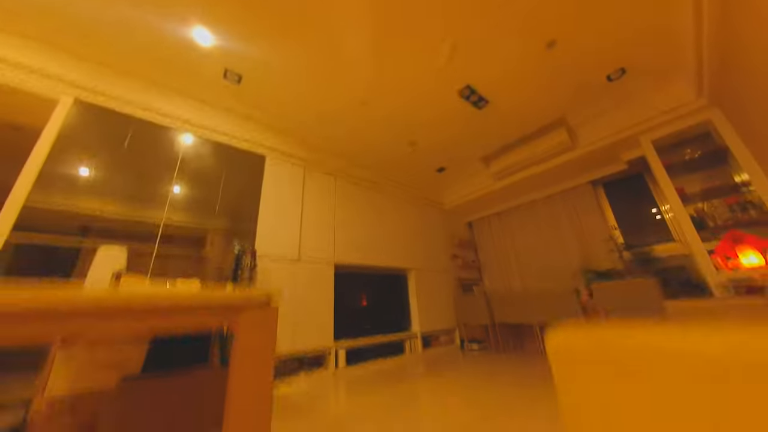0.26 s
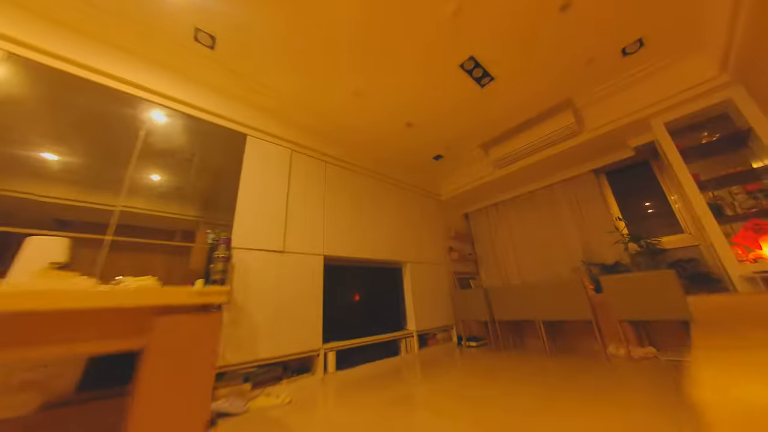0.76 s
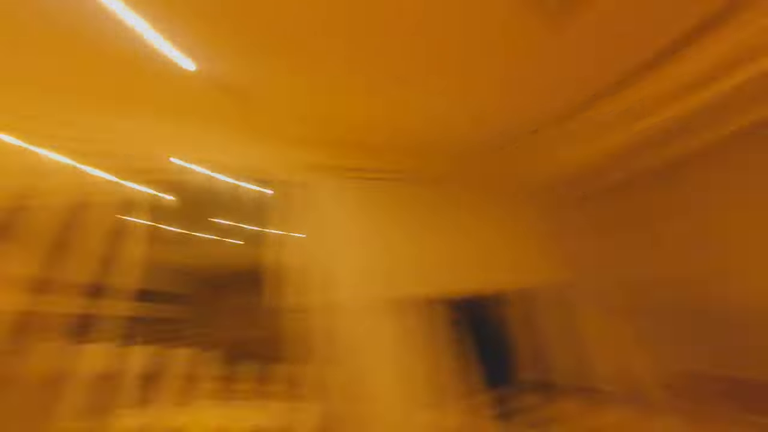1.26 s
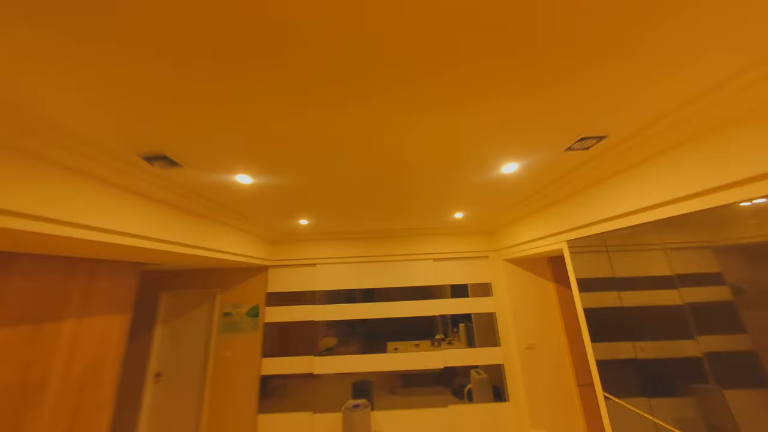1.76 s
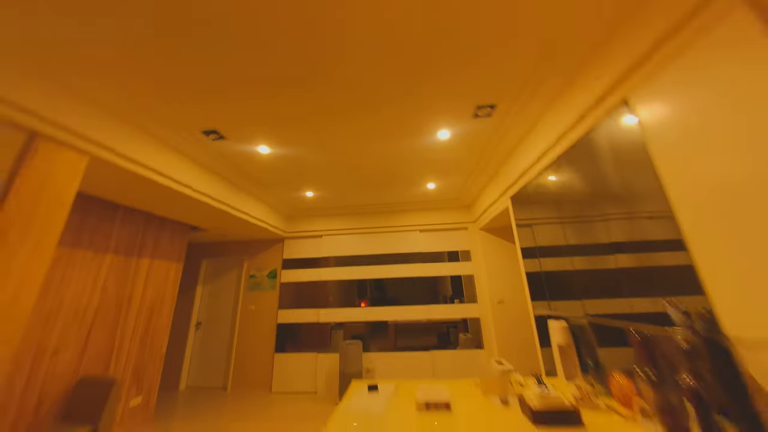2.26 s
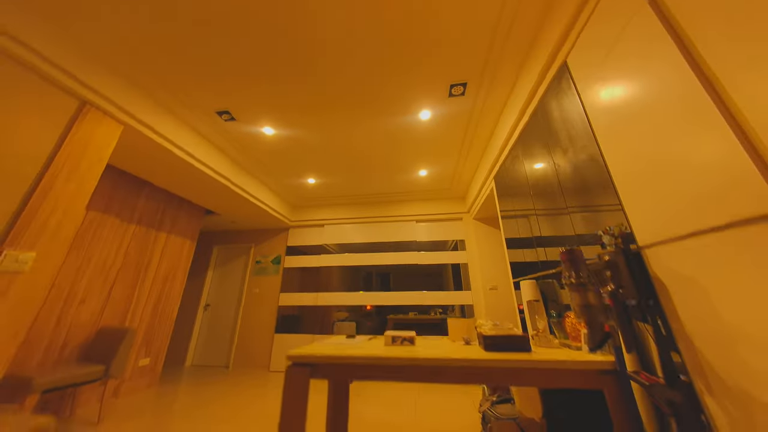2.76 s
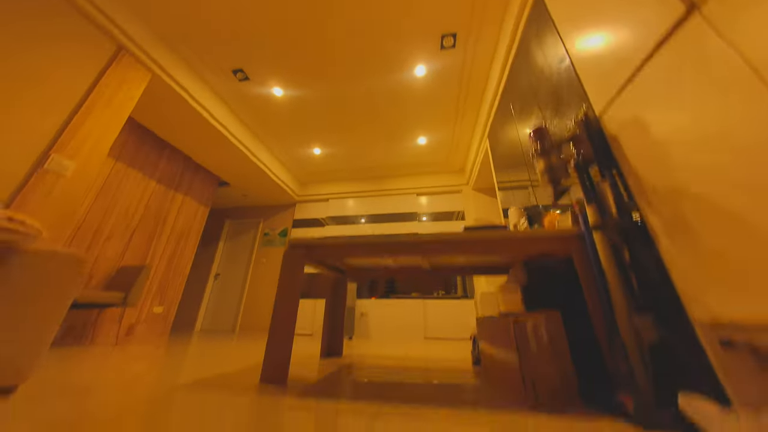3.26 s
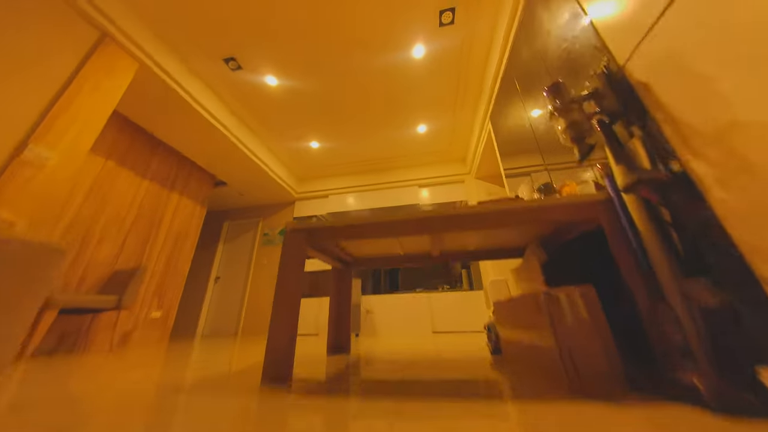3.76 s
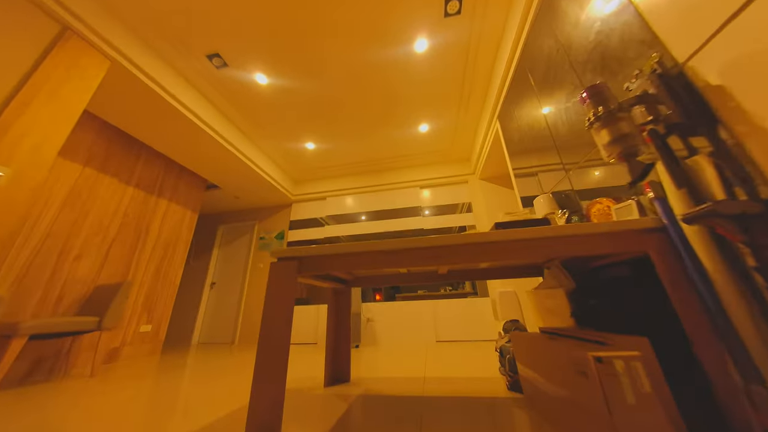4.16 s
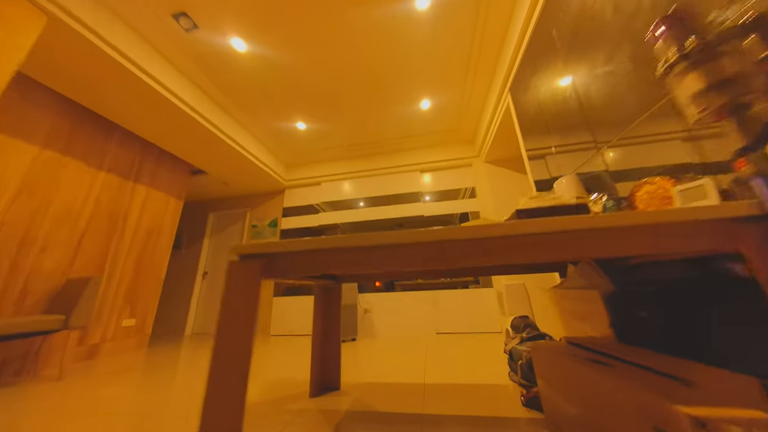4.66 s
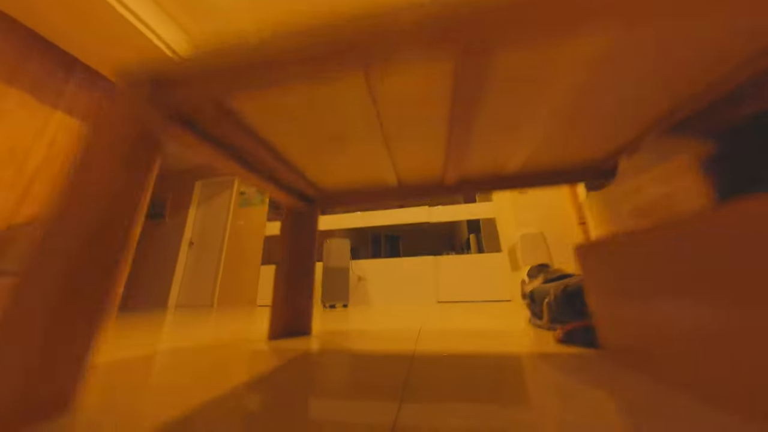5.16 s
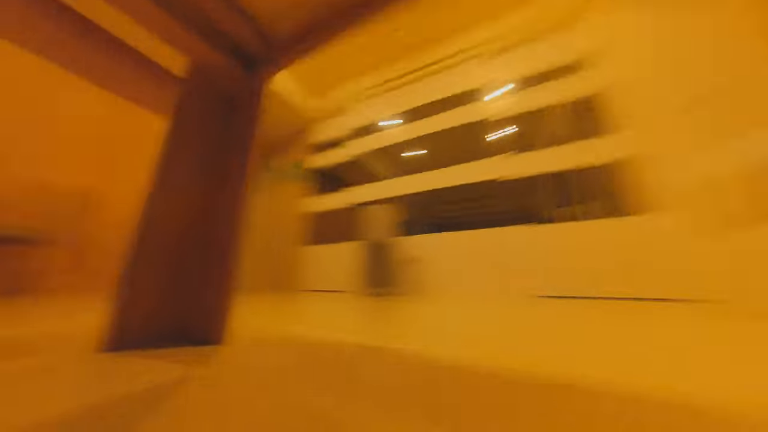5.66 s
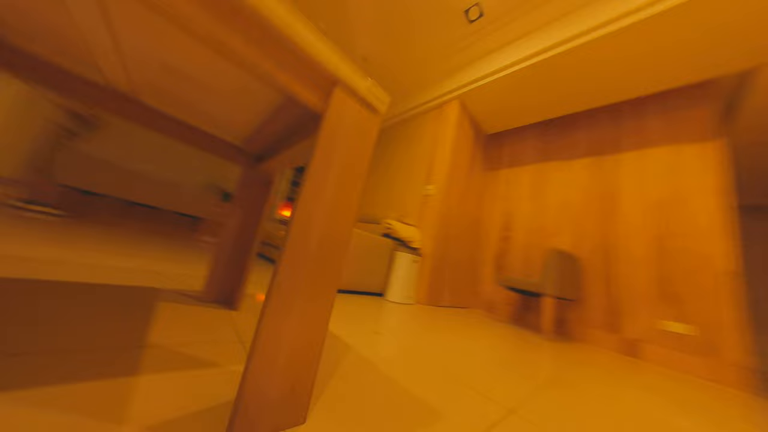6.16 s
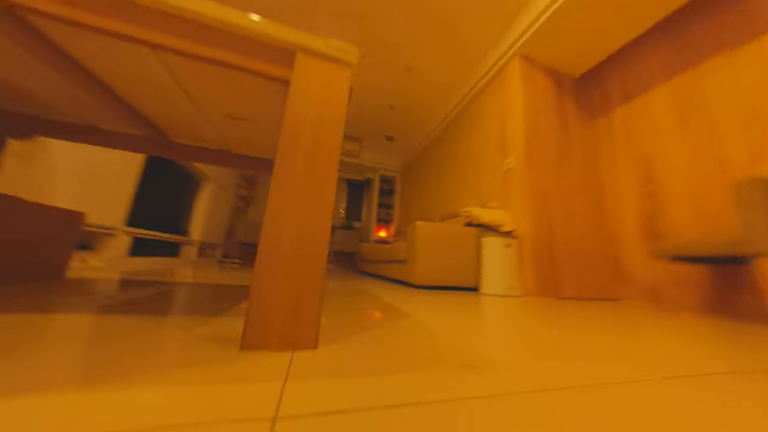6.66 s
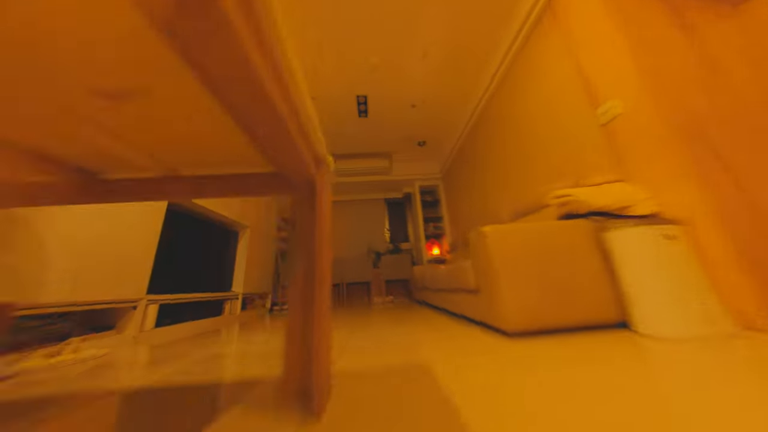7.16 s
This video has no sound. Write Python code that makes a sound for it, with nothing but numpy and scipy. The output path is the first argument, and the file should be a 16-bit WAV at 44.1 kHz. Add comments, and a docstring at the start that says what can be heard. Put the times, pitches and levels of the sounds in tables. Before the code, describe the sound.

A close microphone on a little indoor drone catches buzzing blades, thin motor whistle and rushing air. Quick throttle bursts swoop up to overloaded screams, then the rotors coast down and nearly fade. After that the whine rises and dips in smoother waves, jolted once midway by a rough flutter and a wind thump, and ends in a steady wavering buzz. The room adds only a short, tight reflection.

```python
"""Quadcopter in a living room

A small quadcopter flies low, heard from the camera it carries, as the throttle rises and is cut.
Four three-blade rotors, summed from harmonics of their shaft rates, whine and beat; motors whistle thinly.
Filtered noise gives the blade hiss, pulsing at the blade rate, and the prop wash on the microphone.
Levels grow with rotor speed, until gain control holds them and the input overloads softly."""
import sys
import numpy as np
from scipy import signal
from scipy.fft import rfft, irfft, next_fast_len
from scipy.io import wavfile
from scipy.ndimage import uniform_filter1d

SR = 44100
rng = np.random.default_rng(int(sys.argv[2]) if len(sys.argv) > 2 else 0)


def waveform_to_disk(signal):
    """Save audio, clipped to [-1, 1], as 16-bit WAV at the path in sys.argv[1]."""
    frames = np.transpose(np.atleast_2d(signal))
    scaled = np.clip(frames, -1, 1) * 32767
    samples = np.round(scaled).astype(np.int16)
    wavfile.write(sys.argv[1], SR, samples)


N = 326340
TIME = np.arange(N) / SR   # s
BLADES = 3   # per rotor
HOVER_HZ = 800   # blade-pass rate at hover

# levels at hover ahead of the gain control [dB], and their growth with speed [dB per octave]
WHINE_DB, WHINE_DB_PER_OCTAVE = -7, 14.0
HISS_DB, HISS_DB_PER_OCTAVE = -9.5, 13.5
WASH_DB, WASH_DB_PER_OCTAVE = -29.5, 14
STALL_OCTAVES = 0.58   # above hover by this much, more speed adds nothing to this growth
# louder while spinning up, softer while coasting [dB per octave/s]
WHINE_DB_PER_OCTAVE_S, HISS_DB_PER_OCTAVE_S = 0.26, 0.12
MOTOR_DB = -9   # motor whistle relative to the hiss level
# rotors this close in speed sing together: louder, with a stronger third blade harmonic
UNISON_OCTAVES, UNISON_DB, UNISON_THIRD_DB = 0.041, 8, 10
SCREAM_HOLD_S = .045   # the sharp blade stroke lingers while the rotor winds down
JOLT_S, JOLT_OCTAVES, JOLT_DECAY_S = 3.635, .28, .05   # sudden correction just above the floor
CUTOFF_HZ = 15750


def rotor_rates():
    """Blade-pass rates: thrust control moves all four rotors, steering sets their speeds apart."""
    # throttle, as the fastest rotor's turning points: (time [s], blade-pass rate [Hz])
    throttle = [(0.0, 1087), (0.09, 573.5), (0.17, 426.7), (0.28, 660), (0.44, 1023), (0.551, 1354),
                (0.65, 844.5), (0.719, 636.6), (0.785, 723.3), (1.018, 845.3), (1.192, 1202), (1.301, 1050),
                (1.343, 1621), (1.42, 1145), (1.461, 769), (1.552, 705.4), (1.662, 534.6), (1.751, 500),
                (1.94, 388), (2.05, 551.5), (2.16, 631), (2.29, 815), (2.368, 903.8), (2.548, 825.4),
                (2.683, 875.7), (2.761, 689.3), (2.891, 475.8), (3.063, 753), (3.227, 905.3), (3.397, 819),
                (3.612, 884.6), (3.653, 895), (3.777, 805), (4.052, 714), (4.12, 714.5), (4.295, 843),
                (4.465, 785), (4.674, 773), (4.809, 672), (4.976, 605.4), (5.222, 940.4), (5.395, 908),
                (5.53, 746.4), (5.635, 702.2), (5.769, 1008), (5.893, 966.6), (6.022, 840), (6.163, 845),
                (6.312, 661), (6.47, 616), (6.588, 664), (6.734, 842.5), (7.075, 841.6), (7.234, 750.4),
                (7.4, 768)]
    # steering, as how far the slowest rotor runs below the fastest: (time [s], spread [octaves])
    steering = [(0, 0.088), (.33, .1), (.69, .29), (.82, .18), (1.25, 0.21), (1.9, 0.086), (2.14, .24),
                (2.3, .11), (2.65, .11), (2.95, 0.036), (3.26, .16), (3.62, .25), (3.77, .11), (4.04, .29),
                (4.43, .14), (4.63, .18), (4.97, .1), (5.55, 0.22), (6.04, .1), (6.18, .23), (6.55, 0.041),
                (6.95, .14), (7.4, .12)]
    # each rotor's part of that spread, fastest to slowest: [fraction]
    spread_share = [0, .12, .52, 1]
    # sharp turns that brake the two slower rotors:
    # (time [s], half length [s], third rotor drop [octaves], slowest rotor drop [octaves])
    sharp_turns = [(0.178, .04, 0.0082, .4), (1.368, .06, 1.25, 1.25), (1.76, .3, .08, 1.1),
                   (5.8, .12, 0.013, .62)]
    s, hz = np.transpose(throttle)
    lead = glide(s, np.log2(hz))
    below = np.outer(spread_share, np.interp(TIME, *np.transpose(steering)))
    for at, half, third, slowest in sharp_turns:
        below += np.outer([0, 0, third, slowest], swell(at, half))
    # the correction kicks the faster rotors up most
    kick = JOLT_OCTAVES * (TIME > JOLT_S) * np.exp(-np.abs(TIME - JOLT_S) / JOLT_DECAY_S)
    kick = uniform_filter1d(kick, size=500)
    return 2 ** (lead - below + np.outer(1 - np.array(spread_share), kick))


def rotor(blade_hz, voice_db, wobble=0.001193, wobble_hz=30, flutter_db=3.0, idle_db=-2.5, load_db=0.42):
    """Rotor tones fall on multiples of the shaft rate; small trims of the flight controller unsteady it."""
    # every third multiple is a blade harmonic, the others come from imbalance:
    # (multiple of the shaft rate, relative level [dB])
    orders = [(1, -19), (2, -24), (3, 4.5), (4, -42), (5, -25.5), (6, -1.5), (7, -38), (8, -19.5), (9, 0.5),
              (12, -6.5), (15, -11)]
    # jolts that make the rotors hunt: (time [s], half length [s], rms unrest [fraction of speed])
    jolts = [(1.466, 0.027, 0.051), (1.66, .1, .014), (3.65, .025, 0.082), (3.728, 0.054, 0.036),
             (5.817, 0.1491, 0.01029), (6.918, 0.18, 0.01)]
    # blade harmonics that swell at full throttle: multiple of the shaft rate -> boost [dB]
    scream_boost = {3: 3, 6: 16, 9: 12, 12: 16}
    unrest = wobble + sum(share * swell(s, half) for s, half, share in jolts)
    speed = blade_hz * (1 + unrest * drift(wobble_hz))
    shaft = 2 * np.pi * np.cumsum(speed) / (BLADES * SR)   # angle, radians
    # overtones weaken below hover speed and strengthen while spinning up; a coasting blade sounds purer
    idling = np.maximum(np.log2(HOVER_HZ / blade_hz), 0)
    richness = from_db(idle_db * idling + load_db * spin_up(blade_hz))
    # each blade stroke sharpens at full throttle
    lingering = np.interp(TIME - SCREAM_HOLD_S, TIME, strain(blade_hz))
    sharpness = np.maximum(strain(blade_hz), lingering ** 2)
    tones = np.zeros(N)
    for multiple, db in orders:
        flutter = 1 + (from_db(flutter_db) - 1) * drift(19.3)   # uneven inflow
        boost_db = scream_boost.get(multiple, 0) * sharpness
        gain = from_db(db + voice_db.get(multiple, 0) + boost_db) * flutter
        if multiple > BLADES:
            gain = gain * richness
        tones += gain * np.sin(multiple * shaft + rng.uniform(0, 2 * np.pi))
    return tones, shaft


def motor(shaft):
    """Magnets passing the stator excite high shaft orders; random phase roughens the whistle."""
    # (multiple of the shaft rate, relative level [dB])
    magnet_orders = [(18, -5), (21, 0)]
    surge = from_db(3 * drift(8))   # it comes and goes with the current
    whistle = np.zeros(N)
    for multiple, db in magnet_orders:
        roughness = .4 * drift(39)   # radians
        whistle += from_db(db) * np.sin(multiple * shaft + roughness)
    return surge * whistle


def whine(rates, speed_db=11.0):
    """Superposition: four rotors of unequal rate beat together; also returns motor whistle and blade pulse."""
    # each rotor as the camera hears it, fastest to slowest: (level [dB], shaft imbalance [dB],
    # second blade harmonic [dB], third blade harmonic [dB])
    voices = [(-3, 0.5, 3, 1), (-5, -3.5, -2, -1), (-7, 1.5, 1.5, 1), (-3.5, 2.5, -2, 4)]
    # frame and camera housing, as the tones pass through, lower part: (frequency [Hz], gain [dB])
    housing_low = [(100, -18), (250, 4), (450, -1.5), (800, -4.5), (1100, -2), (1450, 3), (1850, 2),
                   (2200, -8.5), (2650, -13.5), (3100, -10)]
    # the same, upper part: (frequency [Hz], gain [dB])
    housing_top = [(3500, -5), (4600, 1), (6500, 0), (9000, -14)]
    # the frame, as the motor whistle passes through: (frequency [Hz], gain [dB])
    motor_band = [(2600, -30), (3600, -8), (4600, 0), (5600, -2), (7000, -9), (9000, -12), (14000, -25)]
    total, whistle, chop = np.zeros((3, N))
    singing_db = UNISON_THIRD_DB * unison(rates)
    for blade_hz, (db, imbalance_db, second_db, third_db) in zip(rates, voices):
        tones, shaft = rotor(blade_hz, {1: imbalance_db, 6: second_db, 9: third_db + singing_db})
        gain = from_db(db + speed_db * np.log2(blade_hz / rates[0]))   # faster rotors are louder
        total += gain * tones
        whistle += gain * motor(shaft)
        chop += gain * np.cos(BLADES * shaft)
    total = room(colour(total, housing_low + housing_top))
    # level the tones to a running rms near 1
    even = total / np.sqrt(uniform_filter1d(total ** 2, size=2000) + 1e-9)
    return even, rms_one(colour(whistle, motor_band)), rms_one(chop)


def room(x, t60=0.12, wet_db=-14):
    """Reverberation: floor, walls and furniture return a diffuse tail that decays exponentially."""
    t = TIME[:SR // 2]
    decay = from_db(-60 * t / t60)
    tail = rng.standard_normal(len(t)) * decay * (t > .004)
    tail /= np.linalg.norm(tail)
    return x + from_db(wet_db) * signal.fftconvolve(x, tail)[:N]


def hiss(blade_hz, chop, depth=0.053, rush_db=-3.5, rush_rise_db=19.5, gust_db=1.0):
    """Blade-tip turbulence is noise modulated at the blade rate; a broad rush joins in with speed."""
    # turbulence through the housing: (frequency [Hz], spectrum level [dB per Hz])
    tip_spectrum = [(150, -8.5), (400, -16), (800, -5), (1100, -3), (1650, 4), (2050, 0), (2600, -20.5),
                    (3500, -2.5), (4600, 5.5), (5700, -2), (7100, -6.5), (9400, -12.5), (10600, -4.5),
                    (12500, -29), (15500, -23)]
    # open rush of air that takes over at high speed: (frequency [Hz], spectrum level [dB per Hz])
    rush_spectrum = [(150, -5.5), (700, 0.5), (1600, -3.5), (2700, -2), (4600, -3), (8000, 0), (10600, -1),
                     (12500, -4), (15500, -5.5)]
    octaves = np.minimum(np.log2(blade_hz / HOVER_HZ), .2)
    pulsing = (1 + depth * chop) * from_db(gust_db * drift(6.7))
    rush_gain = from_db(rush_db + rush_rise_db * octaves)
    return air(tip_spectrum, pulsing) + rush_gain * air(rush_spectrum, pulsing)


def air(spectrum, pulsing):
    """Turbulence as modulated stereo noise of rms 1: uncorrelated side noise widens the treble."""
    # (frequency [Hz], side relative to mid [dB])
    width = [(100, -44), (2000, -91), (4500, -17), (8000, -14), (11000, -9), (15000, -6.5)]
    mid, side = rng.standard_normal((2, N))
    stereo = mid + colour(side, width) * [[1], [-1]]
    return rms_one(colour(pulsing * stereo, spectrum))


def wash(lump_db=3.5):
    """Flow noise: turbulent pressure on the microphone port, mostly low, in random lumps."""
    # (frequency [Hz], spectrum level [dB per Hz])
    buffet_spectrum = [(15, 7), (35, -17), (70, -0.5), (140, -1.5), (300, -8), (700, -13.5), (2000, -70)]
    return rms_one(colour(rng.standard_normal(N), buffet_spectrum)) * from_db(lump_db * drift(3.4))


def gusts(top_hz=42):
    """Transient flow noise: puffs of air on the port carry buffeting and a deep rumble under it."""
    # the craft meets its own wash: (time [s], half length [s], buffeting [dB], deep rumble [dB])
    puffs = [(.42, 0.045, -19, -36), (1.463, .022, -23.5, -15), (1.679, 0.08, -28, -36),
             (2.2, 0.15, -24.5, -38), (3.351, .08, -27, -40), (3.68, .07, -16.5, -21),
             (5.36, 0.088, -21, -25), (5.9, 0.18, -19, -26), (6.86, 0.081, -23.5, -34),
             (7.19, .05, -18.5, -26)]
    band = signal.butter(2, [18, max(top_hz, 30)], "band", fs=SR, output="sos")
    rumble = rms_one(signal.sosfilt(band, rng.standard_normal(N)))
    buffeting = wash()
    total = np.zeros(N)
    for s, half, db, deep_db in puffs:
        total += swell(s, half) * (from_db(db) * buffeting + from_db(deep_db) * rumble)
    return total


def strain(blade_hz):
    """Blade loading rises with speed: 0 in normal flight, 1 at full throttle."""
    return np.clip((blade_hz / HOVER_HZ - 1.25) / .65, 0, 1) ** 1.5


def spin_up(blade_hz):
    """Inertial load: gain of speed in octaves/s, limited, and discounted to nothing at full throttle."""
    rise = uniform_filter1d(np.gradient(np.log2(blade_hz)) * SR, size=1500)
    return np.clip(rise, -7, 4) * (1 - strain(blade_hz))


def unison(rates):
    """Coincidence of rates: 1 when fastest and slowest rotor turn alike, near 0 when well apart."""
    return np.exp(-(np.log2(rates[0] / rates[3]) / UNISON_OCTAVES) ** 2)


def glide(s, values):
    """Inertia: a smooth cubic path through the points that levels off at each peak and dip."""
    step = np.maximum(np.diff(s), 1e-3)
    slope = np.diff(values) / step
    before, after = slope[:-1], slope[1:]
    # harmonic mean of neighbouring slopes, zero where they change sign
    inner = 2 * np.maximum(before * after, 0) / (before + after + 1e-12)
    tangent = np.r_[slope[0], inner, slope[-1]]
    k = np.clip(np.searchsorted(s, TIME) - 1, 0, len(step) - 1)
    u = np.clip((TIME - s[k]) / step[k], 0, 1)   # position within the step
    bend = (1 - u) * (tangent[k] - slope[k]) - u * (tangent[k + 1] - slope[k])
    return values[k] + step[k] * u * (slope[k] + (1 - u) * bend)


def swell(s, half):
    """Gaussian envelope: a smooth bump of height 1 that falls to 1/e at the half length."""
    return np.exp(-((TIME - s) / half) ** 2)


def drift(rate):
    """Random modulation: noise through a two-pole low-pass at this rate [Hz], rms 1."""
    stride = 40   # samples between computed points
    r = np.exp(-2 * np.pi * rate * stride / SR)
    noise = rng.standard_normal(N // stride + 2002)
    slow = signal.lfilter([1], [1, -2 * r, r * r], noise)[2000:]   # drop the settling time
    return np.interp(np.arange(N) / stride, np.arange(len(slow)), rms_one(slow))


def colour(x, points):
    """Linear filtering: multiply the spectrum by a (Hz, dB) curve on a log-frequency axis."""
    hz, db = np.transpose(points)
    size = next_fast_len(N + 4096)
    bins = np.maximum(np.arange(size // 2 + 1) * SR / size, 1)
    gain = from_db(np.interp(np.log(bins), np.log(hz), db))
    return irfft(rfft(x, size) * gain, size)[..., :N]


def from_db(db):
    """Level to amplitude: 20 dB is a factor of ten."""
    return 10 ** (np.asarray(db) / 20)


def rms_one(x):
    """Normalisation to unit effective (rms) value."""
    return x / np.sqrt(np.mean(x ** 2) + 1e-20)


def scene(scream_db=1.0):
    """Aeroacoustic level grows with rotor speed; at full throttle the tones scream over the hiss."""
    rates = rotor_rates()
    effort = np.minimum(np.log2(rates[0] / HOVER_HZ), STALL_OCTAVES)
    load = spin_up(rates[0])
    whine_db = WHINE_DB + WHINE_DB_PER_OCTAVE * effort + WHINE_DB_PER_OCTAVE_S * load
    whine_db += UNISON_DB * unison(rates)
    hiss_db = HISS_DB + HISS_DB_PER_OCTAVE * effort + HISS_DB_PER_OCTAVE_S * load
    tones, whistle, chop = whine(rates)
    scream = scream_db * strain(rates[0])
    propellers = from_db(whine_db + scream) * tones
    motors = from_db(hiss_db + MOTOR_DB) * whistle
    turbulence = from_db(hiss_db - scream) * hiss(rates[0], chop)
    wind = from_db(WASH_DB + WASH_DB_PER_OCTAVE * effort) * wash() + gusts()
    return propellers + motors + turbulence + wind


def gain_control(x, limit_db=-6.5, window_s=0.011):
    """Dynamic range compression: the camera's gain falls as the running level nears its limit."""
    power = uniform_filter1d(np.mean(x ** 2, axis=0), size=max(int(window_s * SR), 1))
    over = power / from_db(limit_db) ** 2
    return x / (1 + over ** 3) ** (1 / 6)


def record(dry, ceiling=0.94):
    """Saturation and band limiting: after gain control the input rounds its peaks and the top is cut."""
    held = gain_control(dry)
    knee = 7   # higher bends more sharply
    rounded = held / (1 + np.abs(held / ceiling) ** knee) ** (1 / knee)
    low_pass = signal.ellip(12, .1, 80, CUTOFF_HZ, fs=SR, output="sos")
    return signal.sosfilt(low_pass, rounded)


dry = scene()
out = record(dry)
waveform_to_disk(out)
```